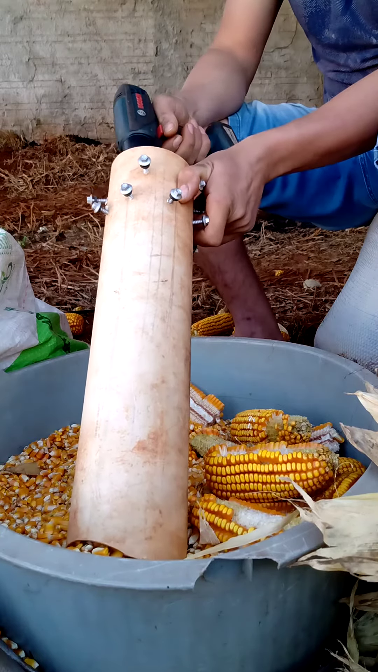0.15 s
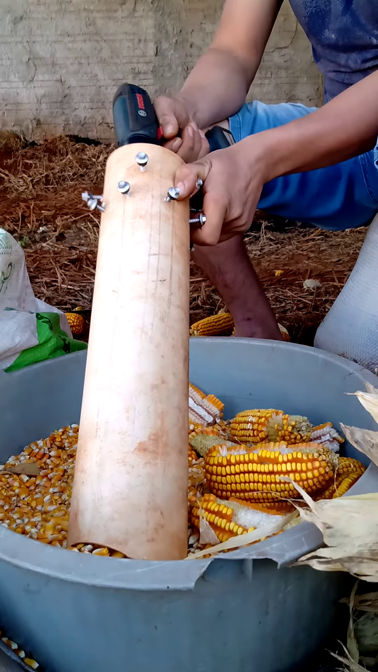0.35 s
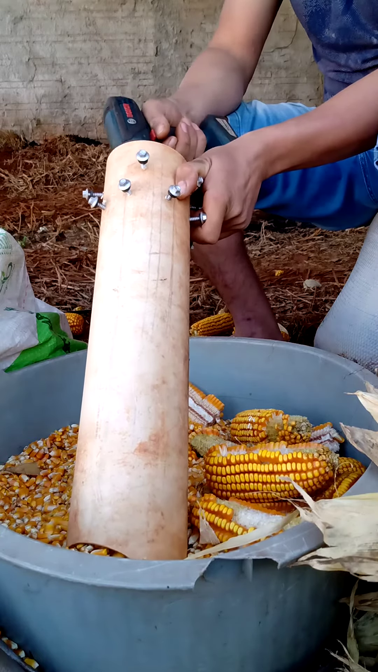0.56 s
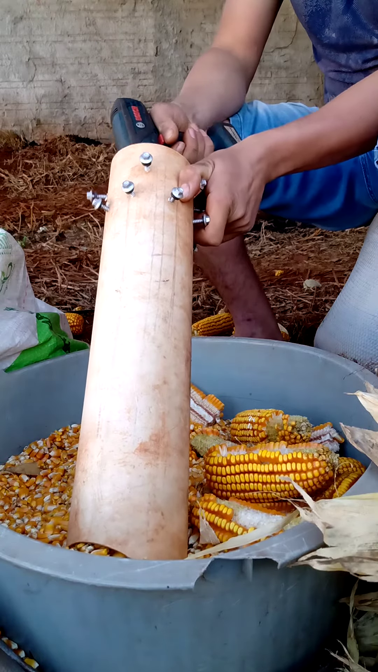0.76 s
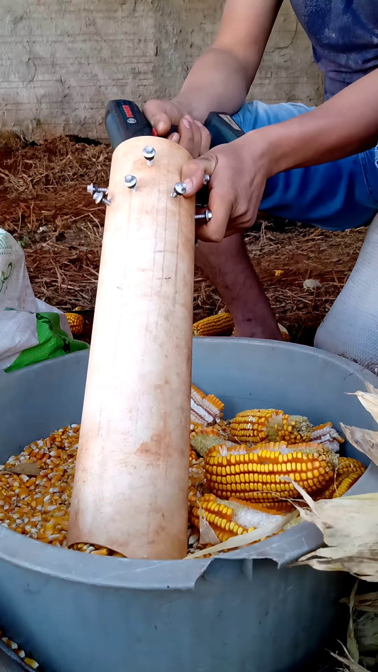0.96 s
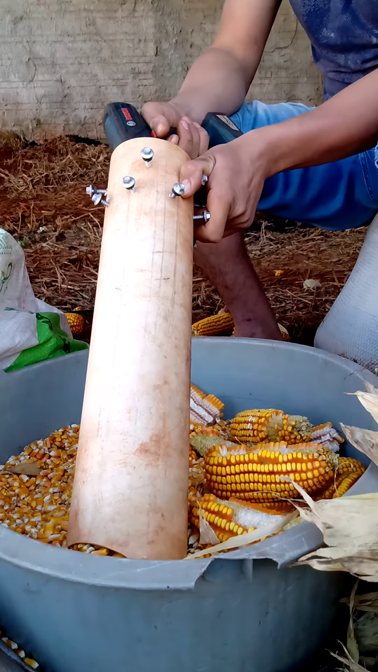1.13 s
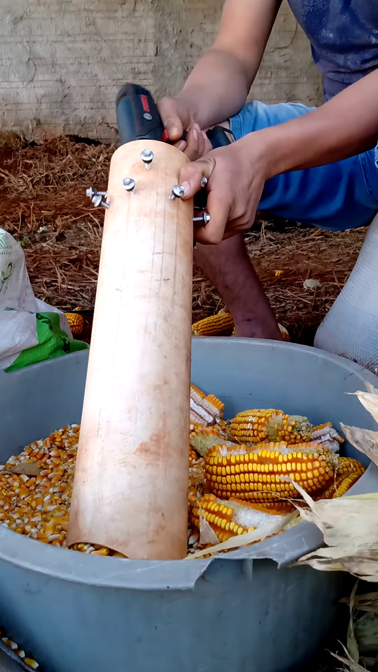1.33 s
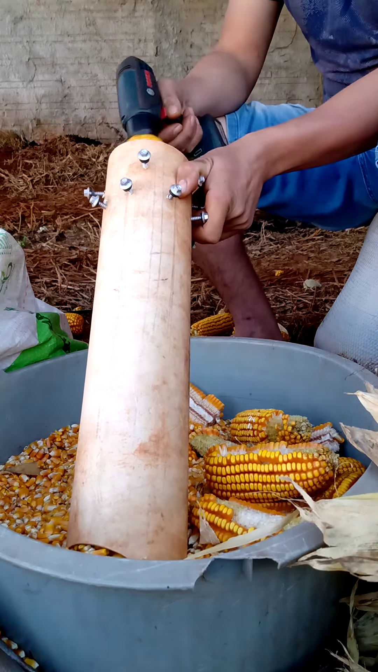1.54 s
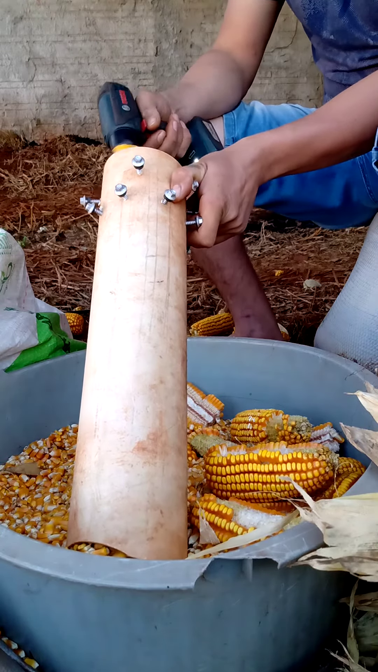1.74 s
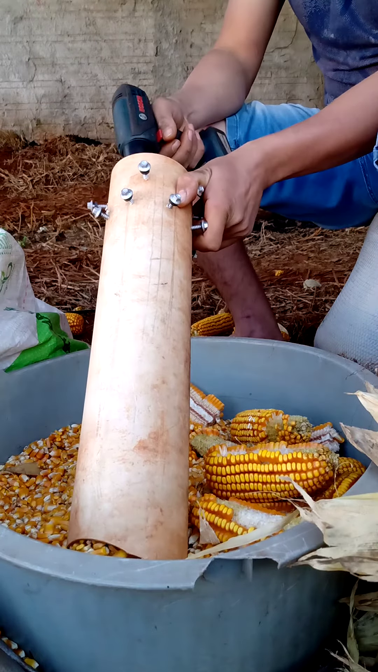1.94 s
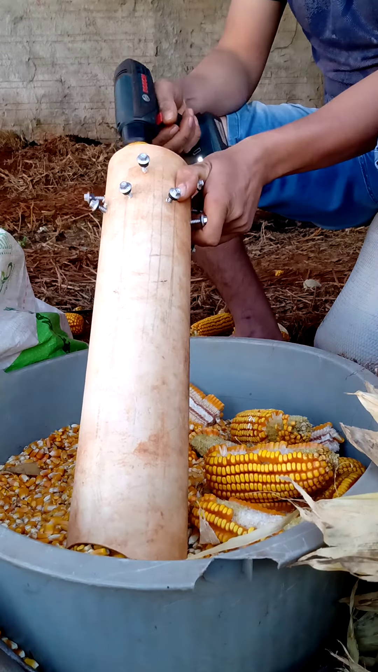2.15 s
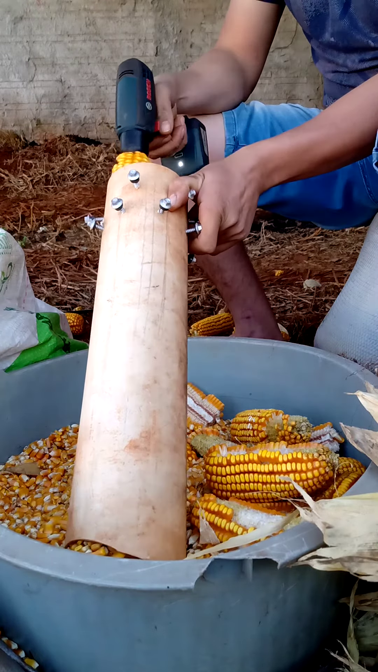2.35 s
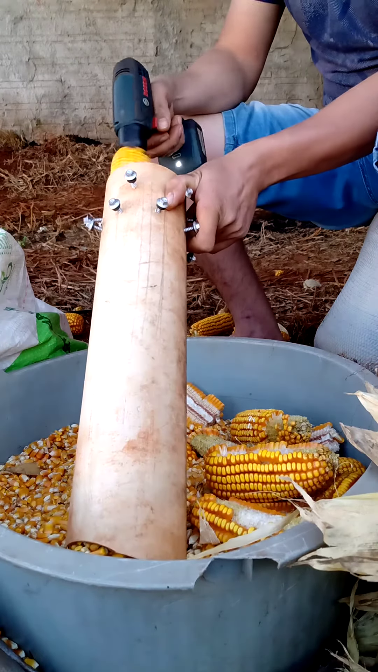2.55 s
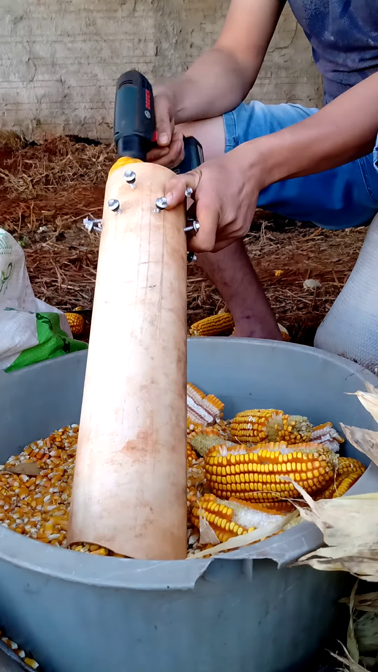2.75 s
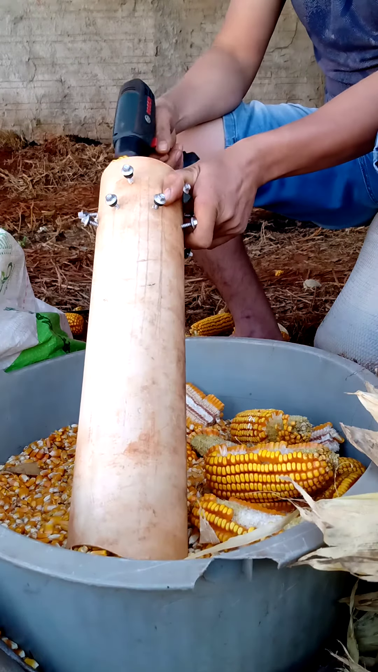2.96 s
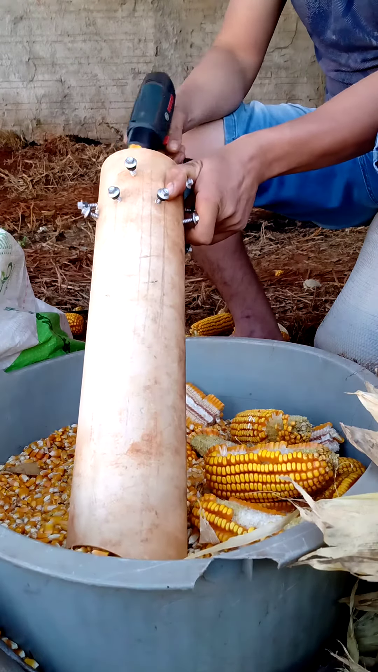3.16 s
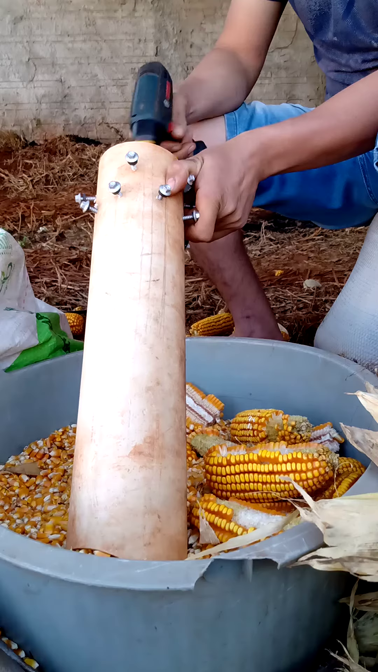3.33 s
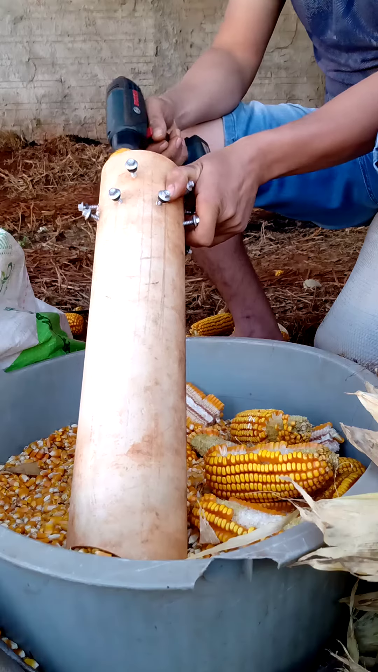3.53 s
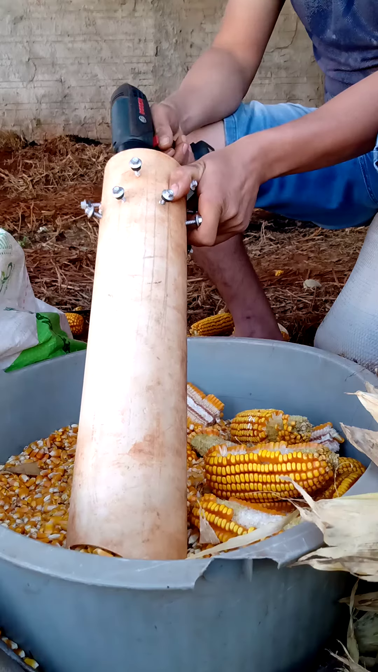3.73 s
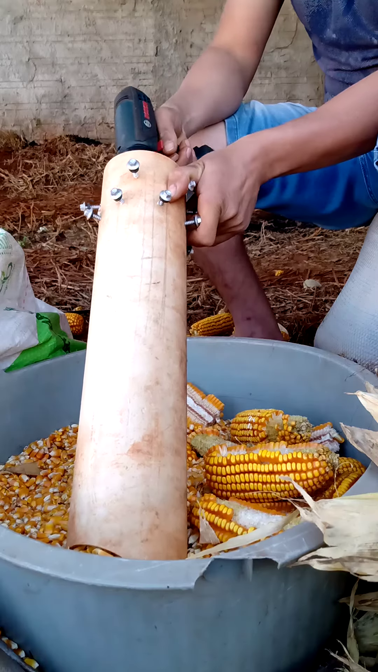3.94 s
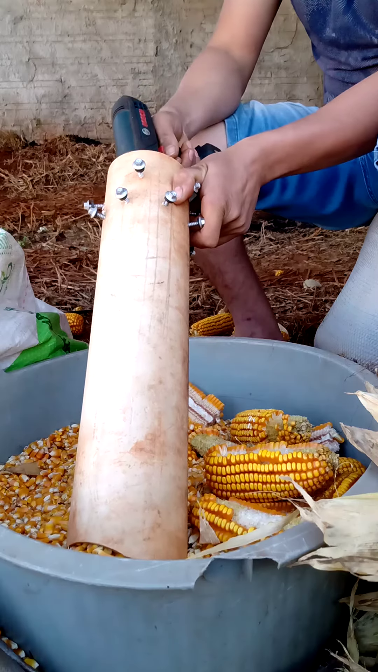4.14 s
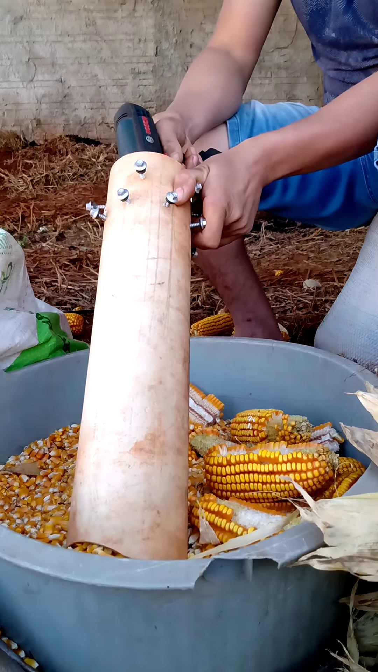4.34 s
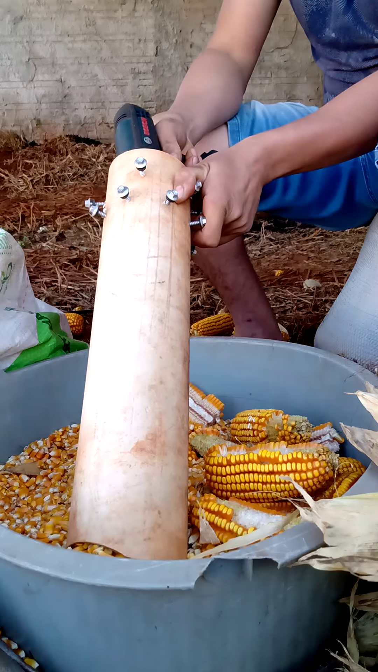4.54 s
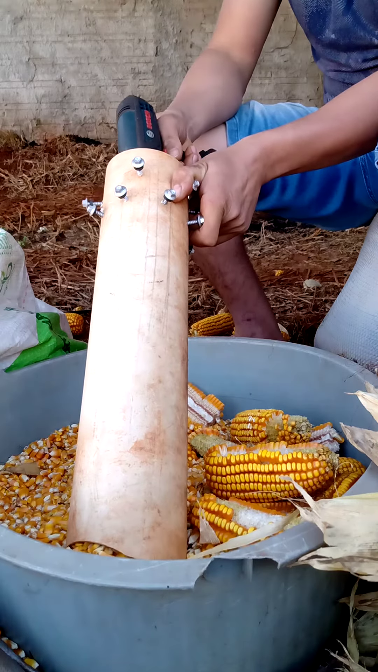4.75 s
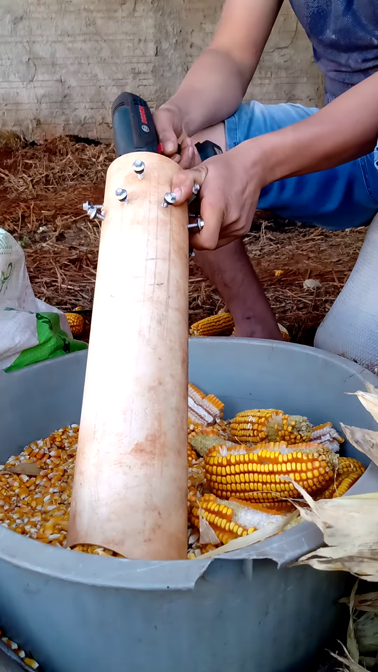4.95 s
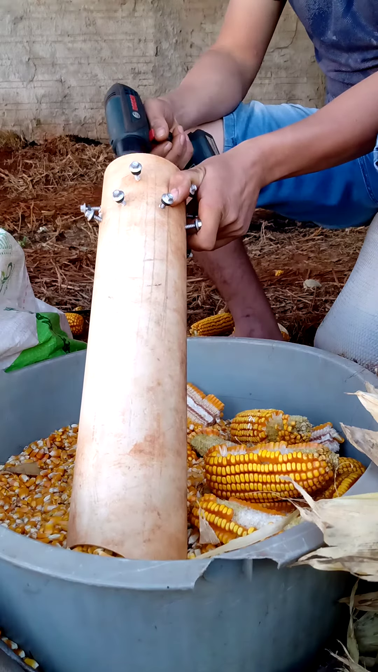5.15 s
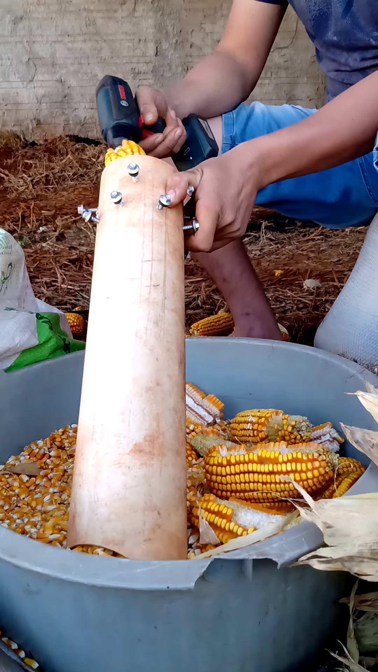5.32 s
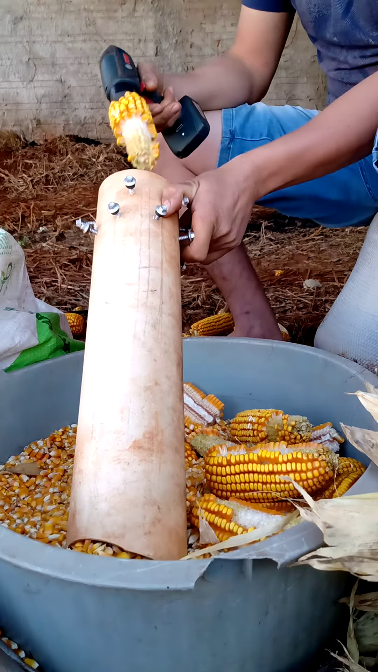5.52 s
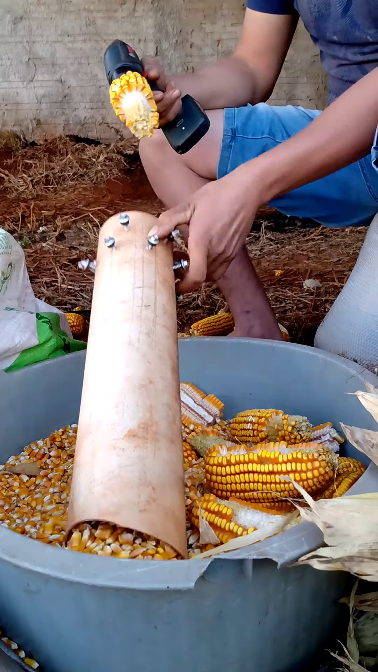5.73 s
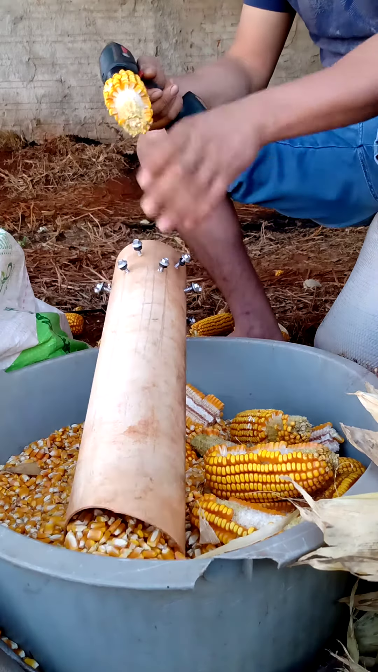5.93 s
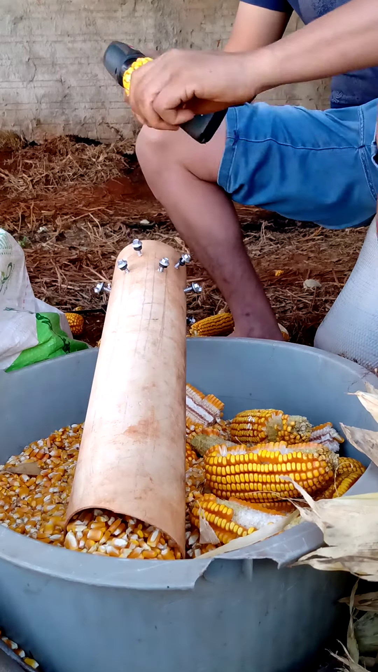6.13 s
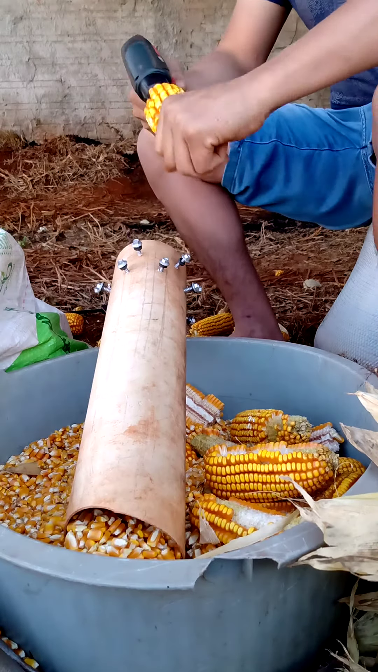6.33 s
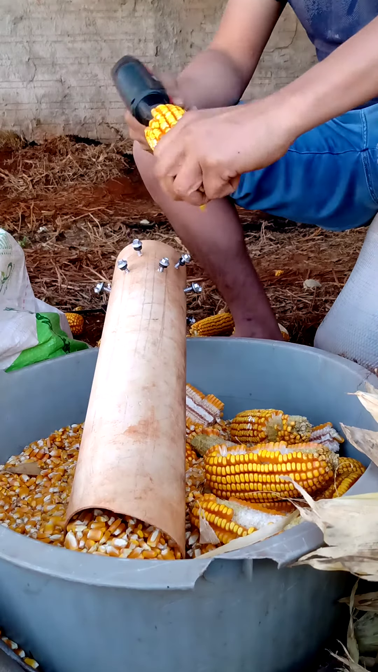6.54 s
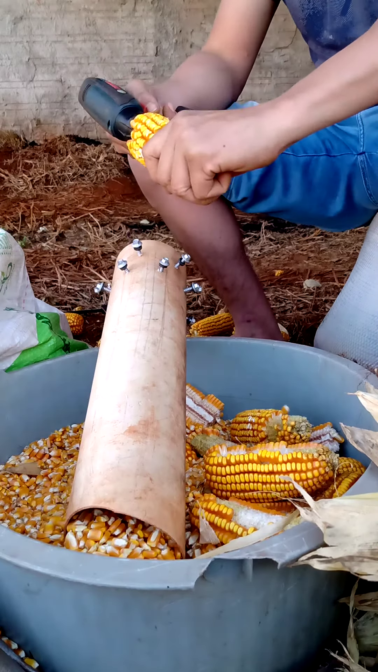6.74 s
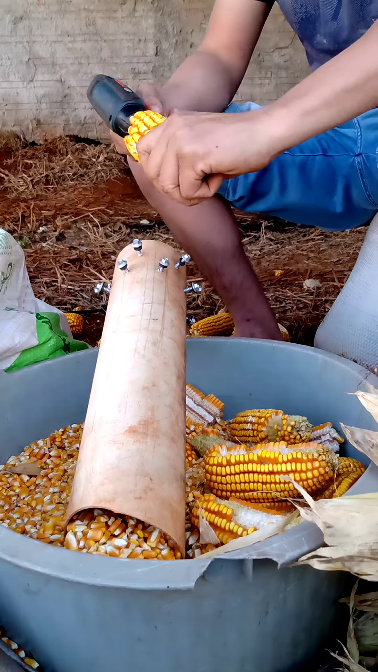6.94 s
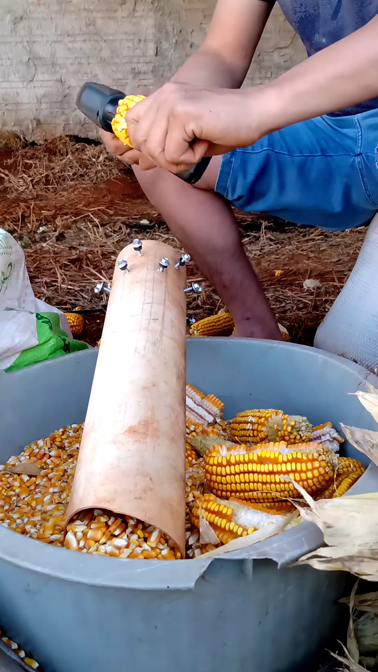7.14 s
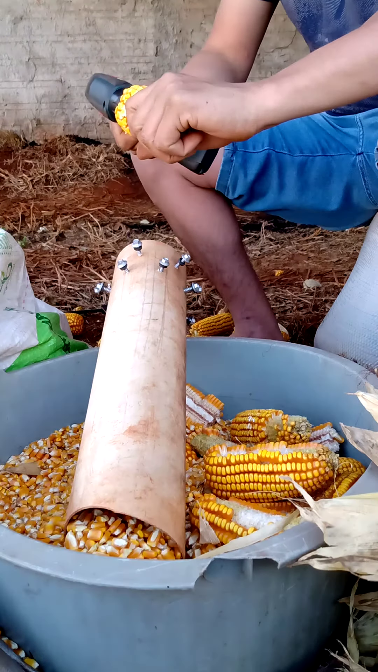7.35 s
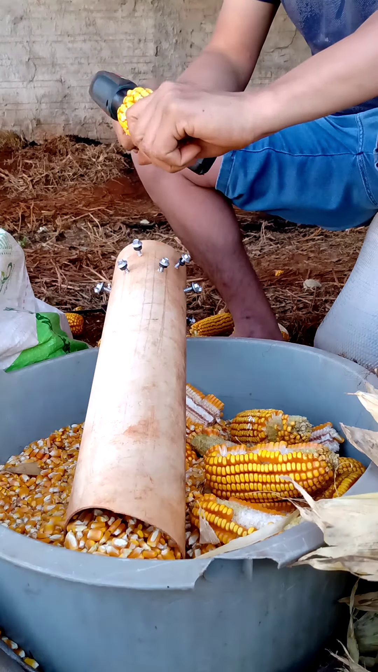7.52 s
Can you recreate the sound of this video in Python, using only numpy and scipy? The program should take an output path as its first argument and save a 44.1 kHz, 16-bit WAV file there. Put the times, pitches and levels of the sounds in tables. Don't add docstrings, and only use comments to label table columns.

```python
import sys
import numpy as np
from scipy import signal
from scipy.fft import rfft, irfft
from scipy.io import wavfile
from scipy.ndimage import uniform_filter1d

SR = 44100
rng = np.random.default_rng(int(sys.argv[2]) if len(sys.argv) > 2 else 0)


def convert_level_to_amplitude(level_db):
    exponent = np.asarray(level_db, float) / 20
    return 10 ** exponent


def unload_wav(signal):
    wavfile.write(
        sys.argv[1],
        SR,
        np.round(np.clip(np.atleast_2d(signal).T, -1, 1) * 32767).astype(np.int16),
    )


N = 338688
TIME = np.arange(N) / SR
HZ = np.maximum(np.arange(N // 2 + 1) * SR / N, 1)


def rms_one(x):
    return x / np.sqrt(np.mean(x ** 2) + 1e-20)


def at_hz(points, hz):
    points = np.array(points)
    return np.interp(np.log(hz), np.log(points[:, 0]), points[:, 1])


def level(rows, order):
    rows = np.array(rows)
    return convert_level_to_amplitude(np.interp(TIME, rows[:, 0], rows[:, order], left=-150, right=-150))


def coloured(x, spectrum):
    return irfft(rfft(x) * convert_level_to_amplitude(at_hz(spectrum, HZ)), N)


def drift(rate):
    r = np.exp(-40 * np.pi * rate / SR)
    white = rng.standard_normal(N // 20 + 2002)
    slow = signal.lfilter([1], [1, -2 * r, r * r], white)[2000:]
    return np.interp(np.arange(N) / 20, np.arange(len(slow)), rms_one(slow))


def ring(clicks, hz, t60):
    r, w = convert_level_to_amplitude(-60 / (t60 * SR)), 2 * np.pi * hz / SR
    return signal.lfilter([0, np.sin(w)], [1, -2 * r * np.cos(w), r * r], clicks + 1e-18)


def high_pass(x, order, hz):
    return signal.sosfilt(signal.butter(order, hz, "high", fs=SR, output="sos"), x)


def band_pass(x, order, low_hz, high_hz):
    return signal.sosfilt(signal.butter(order, [low_hz, high_hz], "band", fs=SR, output="sos"), x)


def strikes(times, strengths, edges, pitches, cycles):
    at = np.clip(np.round(times * SR).astype(int), 0, N - 1)
    white = rng.standard_normal((2, 2, N))
    half_step = np.sqrt(pitches[1] / pitches[0])
    rise = np.exp(-1 / (.0003 * SR))
    out = 0
    for k, hz in enumerate(pitches):
        fade = convert_level_to_amplitude(-120 * np.sqrt(hz / 4500) * 4500 / (cycles * SR))
        power = np.bincount(at, strengths[:, k] ** 2, N) + 1e-18
        puffs = np.sqrt(signal.lfilter([1 - rise], np.convolve([1, -fade], [1, -rise]), power))
        hard = np.bincount(at, edges[:, k] * np.sign(white[k % 2, 0, at]), N)
        blow = puffs * white[k % 2] + hard
        out = out + band_pass(blow, 2, hz / half_step, hz * half_step) * np.sqrt(SR / hz)
    return out


# time in seconds, mesh frequency in Hz, octave level in dB, mesh tone level in dB.
GEAR_MESH = [(0, 4820, -44, -48), (.15, 4832, -44, -48), (.36, 4718, -42, -46), (1.2, 4688, -43, -46),
             (1.42, 4742, -41, -44), (2.2, 4815, -42, -50), (2.42, 4700, -41, -45), (2.55, 4690, -43, -45),
             (2.66, 4735, -42, -43), (3.0, 4685, -41, -44), (3.17, 4700, -42, -52), (3.25, 4755, -42, -52),
             (4.0, 4780, -43, -48), (4.25, 4762, -41, -47), (4.6, 4758, -43, -45), (5.16, 4805, -44, -45)]
# release in seconds, squeeze in seconds, run-down in Hz per second.
TRIGGER_PULLS = [
    (1.43, 1.9, 4600),
    (2.665, 2.8, 3150),
    (3.25, 3.53, 4300),
    (5.17, 9, 3600),
]
SPIN_UP_S = .072


def speed():
    short = 0
    for off, on, hz_per_s in TRIGGER_PULLS:
        lost = hz_per_s * np.clip(TIME - off, 0, on - off)
        short = short + lost * np.exp(-np.maximum(TIME - on, 0) / SPIN_UP_S)
    s, hz, *_ = np.transpose(GEAR_MESH)
    return np.maximum(np.interp(TIME, s, hz) - short, 0), short


BRAKE_S, STOP_DB_PER_S = 5.32, 552


def running():
    return convert_level_to_amplitude(-STOP_DB_PER_S * np.maximum(TIME - BRAKE_S, 0))


COAST_DULL_DB, COAST_DULL_HZ = -10, 1500


def brushes(x, short):
    above = 1 / (1 + (7000 / HZ) ** 10)
    beside_ring = 1 - 1 / (1 + ((HZ - 10400) / 500) ** 4)
    top = irfft(rfft(x) * above * beside_ring, N)
    return x + (convert_level_to_amplitude(COAST_DULL_DB * np.tanh(short / COAST_DULL_HZ)) - 1) * top


# frequency in Hz, width in Hz, height in dB.
HOUSING_MODES = [(10420, 300, 9.5), (6856, 1000, 10), (656, 110, 17), (470, 68, 8.5), (1159, 200, 16.5),
                 (2500, 153, 2.5), (2830, 2600, -5)]


def hiss(spectrum, ringing, throb_db, patchy_db):
    shape = convert_level_to_amplitude(at_hz(spectrum + [(16200, -63.5)], HZ))
    for hz, width, db in HOUSING_MODES:
        shape = shape * convert_level_to_amplitude(ringing * db / (1 + (2 * (HZ - hz) / width) ** 2))
    low = rng.standard_normal((2, N)) * convert_level_to_amplitude(patchy_db * drift(17))
    high = low * convert_level_to_amplitude(throb_db * drift(90))
    cross = 1 / (1 + (HZ / 8500) ** 8)
    return rms_one(irfft(shape * (rfft(low) * cross + rfft(high) * (1 - cross)), N))


# frequency in Hz, density in dB per Hz.
MOTOR_SPECTRUM = [(100, -60.5), (500, -27.5), (1300, -20.5), (2400, -8), (4300, -7), (6200, -11),
                  (7500, -10), (9000, -4), (10800, -6.5), (11600, -13), (13000, -19), (15500, -22.5)]
HISS_DB, HISS_FAST_DB_PER_HZ = -32, .02
HISS_COAST_DB, HISS_COAST_HZ = -1, 400
BRAKE_DB, BRAKE_LENGTH_S = 7.5, 0.035
TONE_GONE_HZ = 520
ROTOR_DB, TEETH = -66, 12


def motor():
    hz, short = speed()
    load_db = HISS_FAST_DB_PER_HZ * (hz + short - 4700) + HISS_COAST_DB * np.tanh(short / HISS_COAST_HZ)
    load_db += BRAKE_DB * np.exp(-((TIME - BRAKE_S) / BRAKE_LENGTH_S) ** 2)
    noise = brushes(hiss(MOTOR_SPECTRUM, ringing=0.89, throb_db=-0.5, patchy_db=2.0), short)
    out = convert_level_to_amplitude(HISS_DB + load_db) * running() * noise + restart()
    wobble, flutter = 0.00066 * drift(55), convert_level_to_amplitude(2.0 * drift(12))
    turn = 2 * np.pi * np.cumsum((1 + wobble) * hz) / SR
    tones = GEAR_MESH + [(BRAKE_S, 0, -42, -50)]
    loaded = 1.8 / (1 + (short / TONE_GONE_HZ) ** 4)
    mesh = level(tones, order=3) * loaded / (1 + (short / 200) ** 2)
    octave = level(tones, order=2) * loaded
    out += flutter * (mesh * np.sin(turn) + octave * np.sin(2 * turn))
    out += convert_level_to_amplitude(ROTOR_DB) * running() * flutter * np.sin(turn / TEETH)
    return out + squeaks(wobble)


# start in seconds, end in seconds, kernel rattle in dB,
# pipe boom in dB, change over the stroke in dB.
COB_STROKES = [(0, 0.484, -29, -44, -3.5), (0.507, 0.972, -27.5, -39.5, -6), (1.33, 1.54, -29, -41.5, -9),
               (1.58, 1.917, -48, -60, 6.5), (1.952, 2.453, -29, -50, -4), (2.557, 2.872, -27.5, -49.5, -9),
               (3.24, 3.563, -45.5, -55, 7), (3.625, 4.07, -37.5, -48, 7),
               (4.099, 4.383, -28, -43.5, -13.5), (4.384, 4.707, -38, -54.5, 6),
               (4.822, 5.344, -57, -52.5, -9)]
PRESS_S, EASE_S = 0.013, 0.0067


def contact(order, idle_db):
    out = convert_level_to_amplitude(idle_db) * running()
    for row in COB_STROKES:
        start, end, change_db = row[0], row[1], row[4]
        pressed = np.clip((TIME - start) / PRESS_S + (start == 0), 0, 1)
        held = pressed * np.exp(-np.maximum(TIME - end, 0) / EASE_S)
        part = np.clip((TIME - start) / (end - start), 0, 1)
        out = np.maximum(out, held * convert_level_to_amplitude(row[order] + change_db * part))
    return out


# time in seconds, peak level in dB, brightest
# frequency in Hz.
KERNEL_CRACKS = [(0.0093, -16, 4600), (0.023, -9.5, 5010), (0.0418, -8.5, 4500), (0.054, -7.5, 4530),
                 (0.058, -23.5, 4850), (0.075, -16, 4130), (0.0834, -7, 4706), (0.0935, -21, 4570),
                 (0.106, -7.5, 4270), (0.115, -11.5, 5150), (0.1227, -8.5, 4600), (0.128, -6.5, 4600),
                 (0.1348, -12, 4370), (0.1434, -9, 4350), (0.1517, -10.5, 3660), (0.177, -19, 4830),
                 (0.1798, -11.5, 4180), (0.1936, -7, 4530), (0.2006, -12, 5070), (0.212, -6.5, 4700),
                 (0.222, -2, 4530), (0.225, -11.5, 5180), (0.2408, -6, 4140), (0.2604, -4.5, 4860),
                 (0.2797, -17, 5030), (0.2836, -19.5, 4560), (0.3, -7, 5940), (0.314, -16, 4660),
                 (0.3193, -10.5, 4630), (0.3381, -13.5, 4420), (0.356, -18.5, 4550), (0.364, -2, 4290),
                 (0.37, -17.5, 4160), (0.3778, -12.5, 4500), (0.388, -5.5, 4130), (0.4201, -18.5, 4440),
                 (0.4264, -7.5, 4620), (0.4536, -18.5, 4700), (0.5167, -13, 4270), (0.5236, -28.5, 4660),
                 (0.5314, -3, 5310), (0.5396, -27.5, 4850), (0.549, -14.5, 4910), (0.567, -14, 4700),
                 (0.5835, -3.5, 4320), (0.593, -13, 4460), (0.6062, -9, 3880), (0.6293, -10.5, 4600),
                 (0.681, -21.5, 4110), (0.6899, -9, 4490), (0.698, -8.5, 4500), (0.7093, -9.5, 3540),
                 (0.7403, -31, 4920), (0.7835, -7, 4480), (0.7918, -10.5, 4140), (0.7982, -8, 3920),
                 (0.8049, -27, 4440), (0.883, -14.5, 4250), (0.8947, -20.5, 4470), (0.903, -11.5, 4460),
                 (0.918, -17, 4220), (0.9523, -17.5, 4610), (1.358, -27.5, 4300), (1.3622, -12.5, 4530),
                 (1.3823, -17.5, 4260), (1.429, -11.5, 4770), (1.4522, -5.5, 5200), (1.494, -16.5, 5300),
                 (1.5036, -7, 4530), (1.507, -12, 4600), (1.522, -7, 4600), (1.5304, -4.5, 5900),
                 (1.5367, -12.5, 5300), (1.5449, -6, 5570), (1.5544, -15.5, 5240), (1.5893, -15.5, 4760),
                 (1.6218, -14, 4950), (1.627, -28, 4870), (1.6498, -15.5, 4920), (1.6851, -16, 4870),
                 (1.7388, -3.5, 5030), (1.7733, -21, 5710), (1.7757, -20.5, 5260), (1.808, -24.5, 4690),
                 (1.832, -14.5, 4220), (1.839, -15, 4440), (1.858, -16, 4790), (1.864, -10, 4470),
                 (1.877, -14, 4440), (1.913, -14, 4650), (1.941, -14, 4740), (1.949, -23, 5380),
                 (1.962, -25, 4510), (1.9668, -12.5, 3900), (1.993, -13, 4310), (2.002, -15.5, 4590),
                 (2.015, -11, 4570), (2.0224, -16, 5030), (2.072, -12, 5070), (2.0798, -12.5, 5280),
                 (2.085, -10, 4600), (2.092, -12, 4260), (2.1014, -7.5, 4640), (2.1165, -7, 5000),
                 (2.1251, -18, 4580), (2.1343, -10, 4720), (2.1437, -24, 4390), (2.191, -21, 4880),
                (2.2103, -13.5, 4790), (2.3488, -12, 4010), (2.3573, -13.5, 4570), (2.3637, -29.5, 5110),
                (2.4098, -13.5, 5750), (2.5759, -18.5, 4710), (2.6163, -35, 4850), (2.7401, -18, 4420),
                (3.2371, -22, 5220), (3.2641, -13, 4840), (3.272, -10.5, 4860), (3.2779, -31, 5590),
                (3.2819, -15.5, 4720), (3.2973, -21, 4860), (3.3051, -10, 5760), (3.3113, -17.5, 5440),
                (3.3557, -12, 4670), (3.37, -6.5, 4570), (3.3925, -8, 5730), (3.429, -18.5, 5460),
                (3.4729, -14.5, 4780), (3.4769, -18.5, 4920), (3.5164, -10, 4440), (3.5271, -16.5, 3640),
                (3.5313, -5.5, 4550), (3.5395, -36.5, 4500), (3.5444, -10, 5290), (3.5902, -17, 4660),
                (3.6159, -11.5, 4830), (3.6358, -12, 4530), (3.6412, -11.5, 4840), (3.6535, -11, 4350),
                (3.6633, -5, 4790), (3.6783, -13.5, 4280), (3.6842, -20, 4450), (3.6913, -18.5, 4600),
                (3.6961, -13.5, 4640), (3.7485, -10, 3900), (3.7585, -17, 4600), (3.7688, -8.5, 5510),
                (3.8106, -5, 4670), (3.8205, -20.5, 4170), (3.8797, -16, 4980), (3.8861, -8.5, 4330),
                (3.8903, -6.5, 4650), (3.901, -14, 3760), (3.9128, -5.5, 4280), (3.9177, -17, 5440),
                 (3.936, -8, 5500), (3.946, -11.5, 4720), (3.966, -14, 5120), (3.9742, -13, 4700),
               (3.98, -6.5, 4920), (3.986, 0.5, 5520), (3.9919, -4, 5440), (4.002, -18, 4010),
               (4.0122, -10, 6900), (4.0315, -14.5, 6050), (4.0672, -17.5, 4760), (4.123, -7.5, 4310),
               (4.135, -9, 4620), (4.1388, -4.5, 4130), (4.1436, -10, 4370), (4.152, -5, 4480),
               (4.1573, -25.5, 4440), (4.1615, -16, 4670), (4.1773, -19, 4980), (4.285, -14.5, 4300),
               (4.4226, -18.5, 3940), (4.4262, -11.5, 4010), (4.433, -12.5, 4280), (4.444, -11.5, 4420),
               (4.5211, -14, 4150), (4.5624, -15.5, 4080), (4.5698, -11, 4170), (4.578, -14.5, 4100),
               (4.5982, -7, 4000), (4.6138, -16, 4200), (4.6215, -13, 4540), (4.628, -12.5, 4370),
               (4.648, -19, 4450), (4.657, -18.5, 4270), (4.6982, -14.5, 4540), (4.9068, -12.5, 4190),
               (5.008, -11.5, 4730), (5.0156, -19.5, 4800), (5.0208, -2, 4600), (5.0326, -3.5, 4630),
               (5.1014, -16.5, 4350), (5.1096, -10.5, 4730), (5.117, -8.5, 4270), (5.1254, -25, 4100),
               (5.1303, -10, 4930), (5.2037, -12.5, 4330), (5.2078, -21, 4710), (5.2152, -15, 4630),
               (5.288, -30, 5330), (5.3016, -16.5, 4860), (5.3193, -12.5, 4770), (5.3268, -16, 5200)]
# frequency in Hz, density in dB per Hz.
KERNEL_SPECTRUM = [(900, -3), (1400, -20), (2400, -2.5), (3200, 4.5), (3900, -7), (4750, 2.5), (6000, -7),
                   (8000, -7), (11000, -22), (15000, -46.5)]
SNAP_DB, CRACK_DB = 11, -1.5
IDLE_RATTLE_DB, SETTLE_DB, SETTLE_DB_PER_S = -40.5, -50, -39
KNOCKS = 8000


def kernels():
    pitches = np.geomspace(1130, 15660, num=12)
    wall = convert_level_to_amplitude(at_hz(KERNEL_SPECTRUM, pitches)) * np.sqrt(pitches / 4500)
    s, db, hz = np.transpose(KERNEL_CRACKS)

    times = rng.uniform(0, 5.75, size=KNOCKS)
    swell = np.sqrt(convert_level_to_amplitude(2 * db) @ np.exp(-((times - s[:, None] - .003) / 0.0062) ** 2))
    settling = convert_level_to_amplitude(SETTLE_DB + SETTLE_DB_PER_S * (TIME - BRAKE_S).clip(0))
    rattle = contact(idle_db=IDLE_RATTLE_DB, order=2) + settling
    strength = convert_level_to_amplitude(-6.0) * rattle[(times * SR).astype(int)] + convert_level_to_amplitude(-26) * swell
    sizes = strength * rms_one(convert_level_to_amplitude(3.5 * np.minimum(rng.exponential(size=KNOCKS), 3.6)))
    hail = sizes[:, None] * wall * convert_level_to_amplitude(3.25 * rng.standard_normal((KNOCKS, 12)))

    near = np.exp(-(np.log2(pitches / hz[:, None]) / 0.18) ** 2)
    colour = wall * (0.88 + 1.2 * near) * convert_level_to_amplitude(3.5 * rng.standard_normal((len(s), 12)))
    cracks = convert_level_to_amplitude(db)[:, None] * colour / np.linalg.norm(colour, axis=1, keepdims=True)
    bodies = np.r_[hail, convert_level_to_amplitude(CRACK_DB) * cracks]
    edges = np.r_[convert_level_to_amplitude(6) * hail, convert_level_to_amplitude(SNAP_DB) * cracks]
    return strikes(np.r_[times, s], bodies, edges, pitches, cycles=30)


# frequency in Hz, density in dB per Hz.
YARD_SPECTRUM = [(30, 17.5), (90, 4.5), (400, -1.5), (1200, -2.5), (2500, -9.5), (6000, -17.5),
                 (11000, -20.5), (15500, -26.5)]
YARD_DB = -56.5


def yard():
    gusts = convert_level_to_amplitude(drift(11))
    air = coloured(rng.standard_normal((2, N)), YARD_SPECTRUM + [(16200, -69.5)])
    return convert_level_to_amplitude(YARD_DB) * gusts * rms_one(air)


# time in seconds, level in dB, favoured mode in Hz.
COB_BUMPS = [(0.029, -33, 598), (0.076, -35, 474), (0.188, -24.5, 448), (0.421, -32, 687),
             (0.531, -28, 453), (0.569, -25, 657), (0.706, -21.5, 178.6), (0.796, -31.5, 248),
             (0.857, -27, 690), (0.911, -27, 175), (1.352, -31.5, 490), (2.623, -37, 266),
             (3.659, -37.5, 456), (3.76, -32.5, 687), (3.888, -33, 687), (3.949, -29.5, 611),
             (4.114, -20.5, 253.4), (4.154, -21, 400), (4.193, -31, 238), (4.231, -29, 194),
             (4.278, -29.5, 651), (4.425, -27.5, 250), (4.617, -34, 247.5), (4.689, -31.5, 695),
             (4.831, -35.5, 196), (4.901, -31, 623), (4.982, -38.5, 650), (5.103, -37, 710)]
# frequency in Hz, width in Hz, level in dB.
AIR_MODES = [(104.3, 70, -12), (185, 71, -13.5), (260, 8.3, -13.5), (478.4, 22.4, -2), (617, 47, -4.5),
             (671, 39, -1.5), (880, 130, -3), (1174, 70, -1), (1645, 46, -0.5), (373, 70, -14.5)]
IDLE_BOOM_DB = -63.5


def boom():
    drops = rng.random(N) < 450 / SR
    patter = drops * convert_level_to_amplitude(6.26 * rng.exponential(size=N).clip(0, 3.5))
    patter = patter * contact(idle_db=IDLE_BOOM_DB, order=3)
    s, db, favoured_hz = np.transpose(COB_BUMPS)
    modes, white = 0, rng.standard_normal((2, N))
    for hz, width, mode_db in AIR_MODES:
        favour_db = 10.8 * np.exp(-(np.log2(hz / favoured_hz) / 0.37) ** 2)
        bumps = np.bincount((s * SR).astype(int) + 300, convert_level_to_amplitude(db - 42 + favour_db), N)
        scrape = 300 * uniform_filter1d(uniform_filter1d(bumps, size=300), size=300)
        blows = (convert_level_to_amplitude(-25.0) * patter + scrape) * np.roll(white, int(hz), axis=1)
        gain = convert_level_to_amplitude(mode_db + 1.9 * drift(6.7)) * np.sqrt(width)
        modes = modes + gain * ring(blows, hz, 1.84 / width)
    return band_pass(modes, 2, 125, 2200)


# time in seconds, peak level in dB.
BOLT_SNAPS = [(0.0388, -18.5), (0.2259, -17.5), (0.2992, -12), (0.3192, -25), (2.1211, -19),
              (2.2109, -20.5), (2.9547, -21.5), (3.3922, -18), (3.9335, -19), (5.0285, -21.5),
              (5.1138, -23)]


def snaps():
    s, db = np.transpose(BOLT_SNAPS)
    clicks = np.bincount((s * SR).astype(int), convert_level_to_amplitude(db), N) + 1e-18
    bursts = signal.lfilter([1], [1, -np.exp(-1 / (0.0024 * SR))], clicks)
    return high_pass(bursts * rng.standard_normal((2, N)), 2, 5500)


# time in seconds, peak level in dB, level of the lows in dB, level of the highs in dB.
LOOSE_TICKS = [(5.3921, -31.5, -25, -31), (5.4187, -36, -18, -24), (5.447, -39, -11, -25),
               (5.464, -38, -11, -25), (5.4777, -32, -17, -21), (5.513, -35, -18, -31),
               (5.5498, -45, -12, -23), (5.574, -26.5, -20.5, -24), (5.618, -28, -18.5, -11),
               (5.6451, -46, -20, -27), (5.6613, -35, -13, -14), (5.8362, -26, 1.5, -10),
               (5.8454, -23.5, 0, -21), (5.853, -24, 0, -6), (5.907, -45, 1, -1), (6.139, -44.5, -3, 0),
               (6.1564, -40, -7, 5.5), (6.214, -45.5, -12, -16), (6.2484, -45, -14, -26),
               (6.7342, -37, -23.5, 2), (6.761, -49.5, -35, 5), (6.7965, -48, -31, 0),
               (6.919, -44, -21, -3), (7.1033, -41, -20, -12), (7.154, -21, -7, -0.5),
               (7.5049, -21.5, -11.5, -15)]


def ticks():
    pitches = np.geomspace(1200, 11500, num=9)
    s, db, low_db, high_db = np.transpose(LOOSE_TICKS)
    corners = np.log([1850, 4800, 8900, 11380])
    colour = np.array([np.interp(np.log(pitches), corners, [low, -2.5, high + 4, high - 3])
                       for low, high in zip(low_db, high_db)])
    strengths = convert_level_to_amplitude(db[:, None] + colour - 6.5 + 0.5 * rng.standard_normal((len(s), 9)))
    both = np.r_[strengths, .2 * strengths]
    return strikes(np.r_[s, s + .009], both, convert_level_to_amplitude(4.0) * both, pitches, cycles=76)


# middle in seconds, length in seconds, level in dB.
HAND_RUSTLES = [
    (5.8, .035, -58),
    (5.988, 0.12, -61.5),
    (6.23, 0.041, -67),
    (6.454, .03, -63.5),
    (6.572, 0.032, -63),
    (6.971, 0.031, -63),
]


def rustle():
    swell = sum(convert_level_to_amplitude(db) * np.exp(-((TIME - s) / length) ** 2) for s, length, db in HAND_RUSTLES)
    grain = rng.standard_normal((2, N)) * convert_level_to_amplitude(3.7 * drift(70))
    return swell * rms_one(band_pass(grain, 1, 2500, 9000))


# time in seconds, peak level in dB, contact cut-off in Hz.
PIPE_THUDS = [
    (5.8363, -1, 1190),
    (5.844, -18, 910),
    (5.856, -16, 900),
    (5.878, -23, 814),
    (5.886, -26, 350),
    (5.913, -30, 900),
    (5.949, -37, 299),
    (5.973, -35, 304),
    (6.004, -43, 300),
]
# frequency in Hz, level in dB, 60 dB decay time in seconds.
TUB_MODES = [(126, -16.5, 0.039), (254, 0, 0.063), (293, 7.5, 0.079), (323, 5.5, 0.029), (456, 17, 0.036),
             (666, 27, 0.012), (970, 21, 0.026), (2500, 37.5, 0.013)]


def thuds():
    out = np.zeros(N)
    click = signal.unit_impulse(SR // 4)
    for s, db, cut_hz in PIPE_THUDS:
        at = round(s * SR)
        push = signal.sosfilt(signal.butter(4, cut_hz, fs=SR, output="sos"), click)
        body = sum(convert_level_to_amplitude(mode_db) * ring(push, hz, t60) for hz, mode_db, t60 in TUB_MODES)
        out[at:at + SR // 4] -= convert_level_to_amplitude(db) * body / np.abs(body).max()
    return high_pass(out, 2, 140)


# time in seconds, level in dB.
TUB_RUB = [
    (6.8, -92),
    (6.83, -47),
    (6.86, -51),
    (6.88, -53),
    (6.93, -67),
    (7.0, -60),
    (7.05, -89),
]


def rub():
    drag = band_pass(rng.standard_normal(N), 2, 75, 145)
    return level(TUB_RUB, order=1) * rms_one(drag)


# start in seconds, length in seconds, first pitch in Hz, last pitch in Hz, level in dB.
SWITCH_SQUEAKS = [
    (7.104, 0.049, 4100, 3840, -71.5),
    (7.233, 0.048, 2760, 2670, -64),
    (7.421, 0.092, 7800, 8100, -64),
    (7.453, 0.039, 2440, 2500, -65),
    (7.587, 0.071, 618, 763, -52),
    (7.623, 0.053, 1626, 1790, -45),
    (7.626, 0.068, 3830, 4010, -61.5),
]


def squeaks(wobble):
    out = np.zeros(N)
    for start, length, from_hz, to_hz, db in SWITCH_SQUEAKS:
        part = np.clip((TIME - start) / length, 0, 1)
        phase = np.pi * length * part * (2 * from_hz + (to_hz - from_hz) * part)
        out += convert_level_to_amplitude(db) * np.abs(wobble) / 0.00052 * np.sin(np.pi * part) * np.sin(phase)
    return out


# time in seconds, level in dB.
LATCH_CONTACTS = [
    (7.153, -34),
    (7.1544, -21),
    (7.1623, -38),
]
# frequency in Hz, level in dB, 60 dB decay time in seconds.
LATCH_MODES = [(1290, -17, 0.017), (2980, 3, 0.011), (3514, -1.5, 0.017), (6660, -4, 0.0067),
               (7260, 6.5, 0.0061)]


def latch():
    s, db = np.transpose(LATCH_CONTACTS)
    clicks = np.bincount((s * SR).astype(int), convert_level_to_amplitude(db), N)
    parts = sum(convert_level_to_amplitude(mode_db) * ring(clicks, hz, t60) for hz, mode_db, t60 in LATCH_MODES)
    return high_pass(parts, 2, 900)


# time in seconds, motor hiss in dB.
RESTART_LEVEL = [
    (7.4, -100),
    (7.5, -49),
    (7.68, -35),
]
# frequency in Hz, density in dB per Hz.
SLOW_SPECTRUM = [(180, -61.5), (300, -37), (535, -26.5), (708, -7.5), (985, -22.5), (1700, -10),
                 (4000, -10), (10600, -15), (15500, -24.5)]


def restart():
    noise = hiss(SLOW_SPECTRUM, ringing=0.34, throb_db=3.0, patchy_db=1.5)
    return level(RESTART_LEVEL, order=1) * noise


def echoes(x, t60, cut_hz):
    s = np.arange(SR // 5) / SR
    tail = rng.standard_normal((2, len(s))) * convert_level_to_amplitude(-60 * s / t60) * (1 - np.exp(-s / 0.00024))
    tail = signal.lfilter(*signal.butter(1, cut_hz, fs=SR), tail)
    return signal.fftconvolve(x, rms_one(tail) / np.sqrt(len(s)), axes=1)[:, :N]


# frequency in Hz, level difference in dB.
PORT_DIFFERENCE = [(200, -1.5), (600, -4), (1200, -13), (2000, -9), (2600, -3), (3500, -1), (5000, 2),
                   (6500, -1), (8000, -9), (9200, -17), (10600, -14), (11500, -24), (15500, -20)]
# frequency in Hz, likeness from 0 to 1.
PORT_LIKENESS = [(200, .97), (700, .78), (1200, .6), (2500, .68), (5000, .68), (6800, .62), (7800, .15),
                 (10300, .55), (12000, .2)]
LAG_SAMPLES = 22


def two_ports(x, other, share):
    alike = share * np.clip(at_hz(PORT_LIKENESS, HZ), 0, .999)
    mixed = alike * rfft(x) + np.sqrt(1 - alike ** 2) * rfft(other)
    left = irfft(mixed * convert_level_to_amplitude(at_hz(PORT_DIFFERENCE, HZ)), N)
    return np.array([np.roll(left, LAG_SAMPLES), x])


def scene():
    pipe = motor() + kernels() + boom() + thuds() + rub() + snaps()
    around = ticks() + rustle() + latch()
    pipe = pipe + convert_level_to_amplitude(-9.5) * echoes(pipe, t60=0.066, cut_hz=3100)
    around = around + convert_level_to_amplitude(-10) * echoes(around, t60=0.12, cut_hz=10000)
    around = around + yard()
    self_noise = convert_level_to_amplitude(-72.0) * rng.standard_normal((2, N))
    return two_ports(*pipe, share=1) + two_ports(*around, share=0.081) + self_noise


def low_pass(x):
    return signal.sosfilt(signal.butter(12, 16400, fs=SR, output="sos"), x)


# frequency in Hz, level in dB.
MICROPHONE_RESPONSE = [(2550, 0), (2900, -5), (3350, 0), (16200, 0), (16500, -40)]


def record(dry):
    cut = high_pass(coloured(dry, MICROPHONE_RESPONSE), 3, 75)
    rounded = cut / (1 + (cut / .9) ** 6) ** (1 / 6)
    return low_pass(rounded)


dry = scene()
out = record(dry)
unload_wav(out)
```